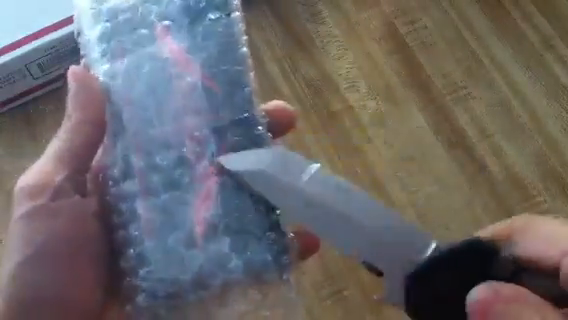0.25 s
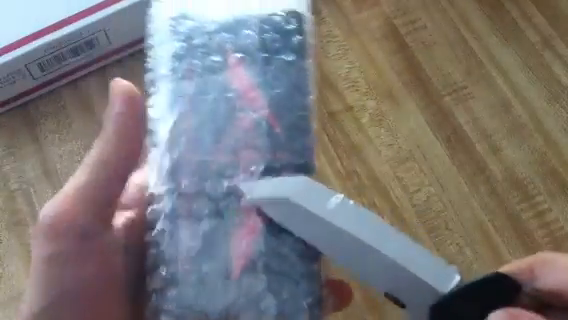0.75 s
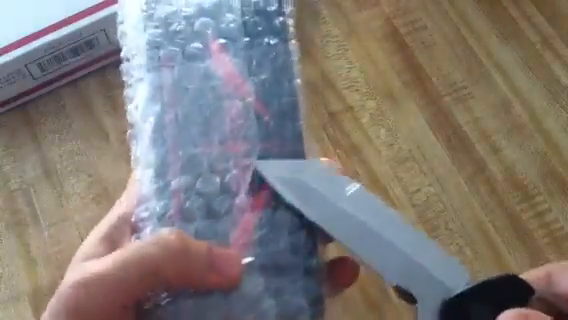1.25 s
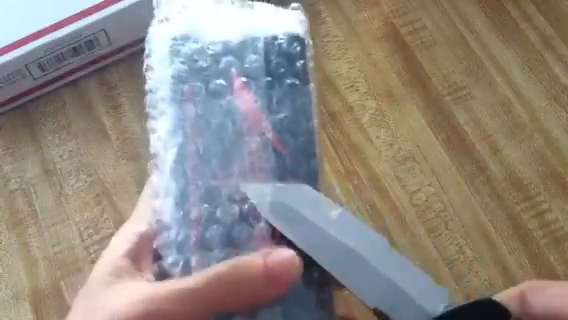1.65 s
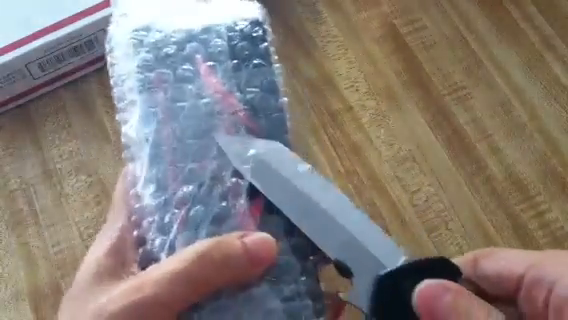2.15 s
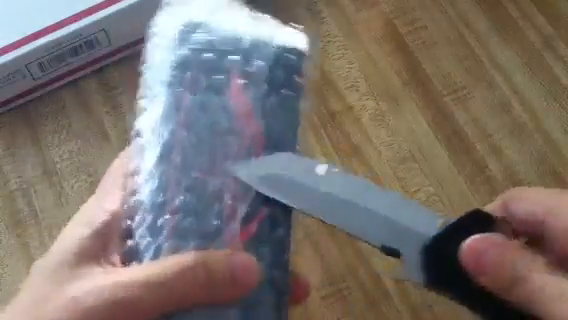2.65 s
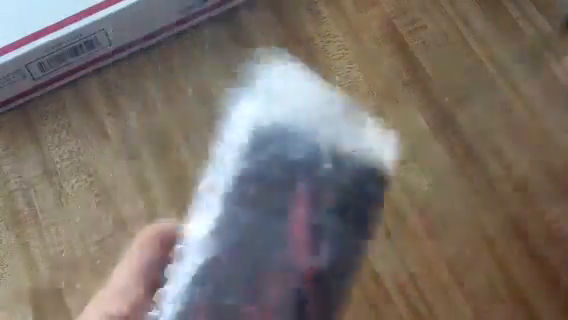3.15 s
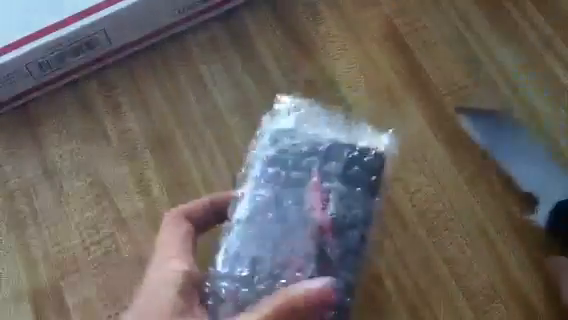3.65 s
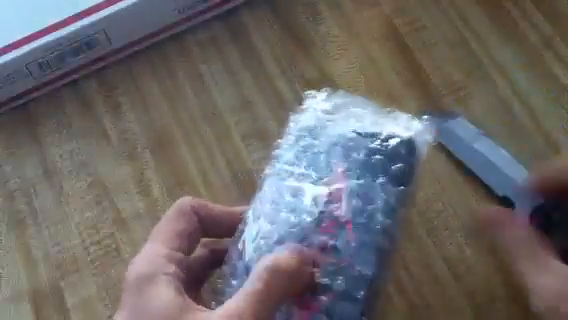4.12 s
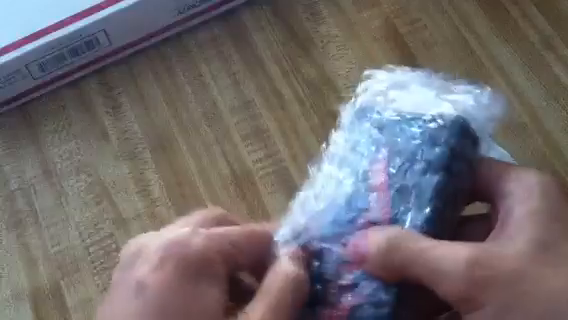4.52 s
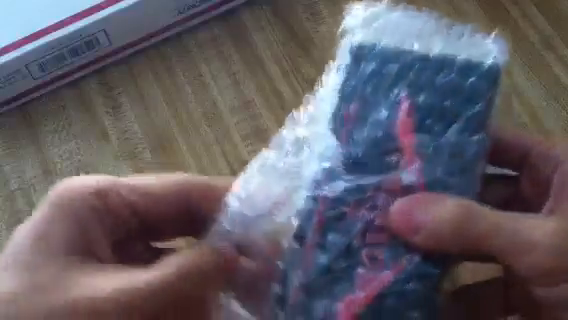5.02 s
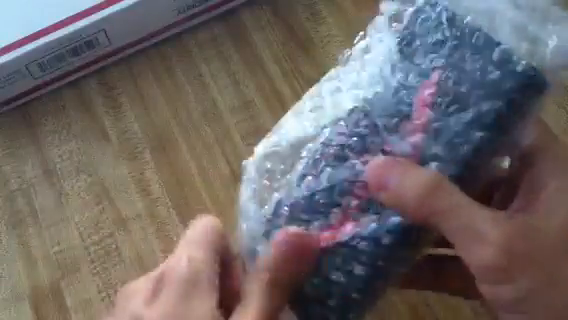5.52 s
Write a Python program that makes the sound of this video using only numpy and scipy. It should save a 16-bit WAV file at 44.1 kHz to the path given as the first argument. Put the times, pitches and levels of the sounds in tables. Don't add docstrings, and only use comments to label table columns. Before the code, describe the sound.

Bubble wrap crackles lightly as a blade picks at it, then tears sharply; the knife clatters onto a wooden table and fingers peel the wrap loudly.

```python
import sys
import numpy as np
from scipy import signal
from scipy.fft import rfft, irfft
from scipy.io import wavfile
from scipy.ndimage import uniform_filter1d

SR = 44100
rng = np.random.default_rng(int(sys.argv[2]) if len(sys.argv) > 2 else 0)


def voltage_ratio(level):
    return 10 ** (np.asarray(level, float) / 20)


def master_out(mix):
    frames = np.transpose(np.atleast_2d(mix))
    ceiling = np.clip(frames, -1, 1)
    pcm = np.round(ceiling * 32767).astype(np.int16)
    wavfile.write(sys.argv[1], SR, pcm)


N = 254898


def evened(x):
    return x / np.sqrt(np.mean(x ** 2) + 1e-20)


def read(points, hz):
    f, value = np.transpose(points)
    return np.interp(np.log(hz + 1), np.log(f + 1), value)


def add(mix, s, sound):
    part = mix[round(s * SR):][:len(sound)]
    part += sound[:len(part)]


def band(x, lo_hz, hi_hz):
    sos = signal.butter(2, [lo_hz, min(hi_hz, SR / 2 - 100)], "band", fs=SR, output="sos")
    return signal.sosfilt(sos, x)


def causal(gain_db):
    both_halves = np.r_[gain_db, gain_db[-2:0:-1]]
    log = np.log(voltage_ratio(np.maximum(both_halves, -100)))
    return np.fft.ifft(np.exp(log - 1j * signal.hilbert(log).imag)).real[:1024]


def air():
    # (frequency [Hz], level [dB per Hz])
    air_spectrum = [(18, -35), (45, -3.5), (204, -1), (319, -8), (702, -19), (844, -11), (988, -18.5),
                    (3310, -25), (5310, -20.5), (8520, -28), (10800, -33), (14800, -23), (16000, -38)]
    # (frequency [Hz], width [Hz], level [dB rms])
    hum_bands = [(115, 7.1, -71), (156.4, 17, -64.5), (330, 48, -74)]
    hz = np.fft.rfftfreq(N, 1 / SR)
    wash = evened(irfft(rfft(rng.standard_normal(N)) * voltage_ratio(read(air_spectrum, hz)), N))
    white = rfft(rng.standard_normal(N))
    hum = 0
    for f, width, db in hum_bands:
        resonance = 1 / (1 + (2 * (hz - f) / width) ** 2)
        hum = hum + voltage_ratio(db) * evened(irfft(white * resonance, N))
    return voltage_ratio(-60.5) * wash + hum


def ducking(x):
    threshold_db, share, recovery_db_per_s = -35, 0.25, 13.5
    power_db = 10 * np.log10(abs(uniform_filter1d(x ** 2, 900)) + 1e-12)
    fall = np.arange(N) * recovery_db_per_s / SR
    held_db = np.maximum.accumulate(power_db + fall) - fall
    over_db = np.maximum(held_db - threshold_db, 0)
    return voltage_ratio(-share * uniform_filter1d(over_db, 900))


def handling():
    # (time of the top [s], top level [dB], 10 dB rise [ms], 10 dB fall [ms], brightness [dB])
    knife_moves = [(.06, -50.5, 200, 108, -8), (.15, -55.5, 13, 37, -2), (.285, -49, 12, 19, -5.5),
                   (.486, -50, 101, 39, -7), (.665, -53.5, 34, 20, -9), (.76, -50.5, 135, 700, -8),
                   (1.004, -48, 78, 53, -6.5), (1.291, -44, 78, 63, -6.5), (1.405, -60.5, 20, 29, -7),
                   (1.598, -45, 68, 280, -6), (1.966, -50.5, 203, 158, -6.5), (2.095, -38.5, 21, 28, -9),
                   (2.411, -52.5, 200, 50, -5.5), (2.639, -52.5, 280, 78, -5.5), (2.746, -52, 70, 122, -7),
                   (3.003, -32, 2.5, 45, -7.5), (3.047, -32, 19, 14, 1), (3.084, -24, 31.5, 11.5, -5),
                   (3.178, -38.5, 88, 31, -11.5), (3.25, -51.5, 92, 189.5, -8.5),
                   (3.401, -50, 14, 704, -10.5), (3.623, -46.5, 47, 46, -11), (3.764, -46.5, 38, 44, -6)]
    finger_moves = [(3.918, -49.5, 730, 60, -9.5), (3.961, -38, 19, 55, -13), (4.04, -42, 30, 99, -22),
                    (4.137, -37.5, 63, 30, -7.5), (4.459, -40, 270, 296, -10), (4.66, -41, 50, 60, -5),
                    (4.741, -30, 25, 25.7, -5.5), (4.798, -31, 30, 120, -9), (4.973, -37, 60, 90, -10),
                    (5.205, -43, 280, 185, -8.5), (5.45, -48, 63, 109, -7.5), (5.571, -35, 27, 38, -9),
                    (5.63, -31.5, 17, 41.7, -8), (5.7, -41.5, 67, 200, -7.5), (5.775, -39, 24, 50, -15)]
    t = np.arange(0, N + 32, 32) / SR
    s, db, rise_ms, fall_ms, bright_db = np.transpose(knife_moves + finger_moves)[:, :, None]
    dull_db = np.repeat([-11.5, -11], [len(knife_moves), len(finger_moves)])[:, None]
    away = 1000 * (t - s) / np.where(t < s, -rise_ms, fall_ms)
    power = voltage_ratio(db - 10 * away) ** 2
    total = power.sum(0)
    level = 10 * np.log10(total)
    dull = (power * dull_db).sum(0) / total
    bright = (power * bright_db).sum(0) / total
    return [np.interp(np.arange(N) / SR, t, control) for control in (level, dull, bright)]


def crease_grains(thick):
    creases_per_s, spread_db, decay_s, half_octaves = 950, 3.0, 0.00035, 1.0
    size = voltage_ratio(spread_db * np.minimum(rng.exponential(1, N), 3.2))
    size *= (rng.random(N) < creases_per_s * thick / SR) / np.sqrt(thick)
    kind, t, grains = rng.integers(0, 24, N), np.arange(128) / SR, np.zeros(N)
    for k, hz in enumerate(np.geomspace(900, 12000, num=24)):
        burst = rng.standard_normal(128) * np.exp(-t / decay_s)
        grain = evened(band(burst, hz / 2 ** half_octaves, hz * 2 ** half_octaves))
        grain = grain * np.sqrt(hz)
        grains += signal.oaconvolve(size * (kind == k), grain)[:N]
    return grains


def crackle():
    # (frequency [Hz], level [dB per Hz])
    film_spectrum = [(210, -20), (350, 1.5), (506, -17.5), (548, -8.5), (928, -4.5), (2270, -3),
                     (3230, 0.5), (5390, -0.5), (6430, -3.5), (13200, -8.5), (16000, -34)]
    level_db, dull_db, bright_db = handling()
    thick = 1 + voltage_ratio(1.2 * (level_db + 41))
    rub = evened(crease_grains(thick)) + 1.12 * rng.standard_normal(N)
    rub = signal.oaconvolve(rub, causal(read(film_spectrum, np.fft.rfftfreq(4096, 1 / SR))))[:N]
    rub /= np.std(band(rub, 1000, 9000))
    clump_db, clump_s = 1.5, 0.012
    clumps = uniform_filter1d(rng.standard_normal(N), int(clump_s * SR))
    rub *= voltage_ratio(clump_db * evened(uniform_filter1d(clumps, 100)))
    low = (voltage_ratio(dull_db + 12.0) - 1) * band(rub, 300, 2500)
    high = (voltage_ratio(bright_db + 9.0) - 1) * band(rub, 4340, 15000)
    return voltage_ratio(level_db - 3.0) * (rub + low + high)


def snap(hz, low_db, high_db, ms, sharp, chance):
    age = np.arange(len(chance)) / SR * 1000 / ms
    slips = chance * abs(chance) ** 1.68
    slips = slips * np.minimum(age * 11.0 + 0.71, 1) * np.exp(-1.4 * age)
    slips[6] += sharp * abs(slips).max()
    ring = evened(band(slips, hz / 1.113, hz * 1.12))
    rustle = evened(band(band(slips, 1620, 6080), 460, 11400))
    body = evened(0.45 * ring + rustle)
    push = voltage_ratio(low_db) * evened(band(slips, 308, 920))
    edge = voltage_ratio(high_db) * evened(band(band(slips, 3760, 12770), 1350, 13200))
    return (body + push + edge) / abs(body + edge).max()


def snaps():
    # (time [s], peak [dB], ring [Hz], bright edge [dB])
    gripping = [(0.139, -35.5, 6750, -15), (0.501, -33, 2740, -2), (0.656, -33.5, 4630, -1),
                (0.7537, -34.5, 3340, -17), (0.9942, -14.5, 2470, -8), (1.0038, -20, 4750, -27),
                (1.2433, -31, 6300, -3.5), (1.2765, -28.5, 3280, -14), (1.3005, -28, 4220, 7),
                (1.41, -36, 5900, -2), (1.674, -39, 3320, -17)]
    picking = [(1.8111, -26.5, 6700, 0.5), (1.9278, -20.5, 7150, 22), (1.9477, -25.5, 2920, -23),
               (1.9918, -23, 5100, -32), (2.0879, -18.5, 2840, 11), (2.2543, -27.5, 7900, 4),
               (2.32, -38, 8950, -3), (2.3376, -32.5, 3300, 2), (2.3964, -23, 4460, -8),
               (2.411, -34.5, 1600, -6), (2.4176, -29, 8400, 5), (2.465, -36, 1900, -12),
               (2.491, -29.5, 3200, 2), (2.5156, -26, 1600, 1.5), (2.6257, -22, 4700, 10),
               (2.653, -32, 7060, 11), (2.7344, -22, 3220, -2.5), (2.7735, -33, 8740, 24),
               (2.8217, -33, 8250, 7), (2.953, -46, 7300, 15)]
    cutting = [(2.9998, -21, 1660, -3), (3.0112, -17, 4700, 12), (3.0161, -16, 4270, 3),
               (3.0281, -18.5, 3270, -19), (3.0645, -19, 4030, 4), (3.0745, -18, 3340, -11),
               (3.0803, -16, 4100, -13), (3.082, -10, 4200, -27), (3.0871, -14, 7400, -17),
               (3.3823, -33.5, 3120, -15), (3.3947, -24.5, 3500, 3)]
    rattling = [(3.715, -29, 4200, -20), (3.9327, -37, 1600, -20), (3.9471, -24.5, 4420, 2),
                (3.952, -26.5, 3920, -15), (4.023, -33, 1890, -18), (4.0468, -27, 1830, -3),
                (4.054, -42, 1810, -21), (4.0836, -19.5, 1400, -18), (3.964, -33, 2500, -20),
                (4.131, -25, 3280, -18), (4.1427, -26, 2100, 7), (4.2232, -34, 2630, -0.5)]
    turning = [(4.254, -22.5, 6440, -2), (4.2767, -22.5, 5040, -1), (4.3993, -26, 4600, -0.73),
               (4.5077, -25.5, 2080, 0.48)]
    peeling = [(4.6205, -9, 3400, -4), (4.6598, -14.5, 4170, 5), (4.6678, -27, 1800, 0),
               (4.7032, -8, 4100, 1), (4.7227, -22, 3270, 4), (4.7369, -7.5, 4830, -4),
               (4.7521, -21, 4400, -4), (4.7765, -19, 3450, 5), (4.7852, -7.5, 3160, -5),
               (4.7875, -6, 4630, -5), (4.7963, -7.5, 3580, -4), (4.8102, -14, 4230, -11),
               (4.8145, -9, 4360, -19), (4.8463, -8.5, 6160, -15), (4.8601, -13.5, 5560, -17),
               (4.905, -9.5, 4470, -7.5), (4.958, -23.5, 3570, -13), (4.9808, -8, 4700, -2.5),
               (5.0574, -23, 7440, 2.5)]
    unfolding = [(5.129, -29, 3540, -6), (5.174, -25, 3600, -4), (5.1951, -19, 3340, 5),
                 (5.2752, -28, 2950, -2), (5.2785, -26, 2840, 5), (5.3324, -30, 3080, 0),
                 (5.4954, -31.5, 3340, -7), (5.5778, -16.5, 4200, 1), (5.5829, -23.5, 3670, -3),
                 (5.6195, -13, 4500, 1), (5.627, -14, 4440, 2.5), (5.6434, -24, 4390, -15),
                 (5.651, -20.5, 4420, 3.5), (5.6556, -19.5, 4050, 1), (5.693, -18.5, 4200, -2),
                 (5.7022, -14.5, 3870, 1), (5.7566, -17, 4200, 9), (5.768, -28, 3270, 5),
                 (5.7727, -10, 4200, 11)]
    flipping = [(1.558, -30.5, 1520, -5), (4.97, -23, 3250, -5.5), (5.0167, -28, 1650, -16),
                (5.184, -34, 1700, -15), (5.222, -40, 2050, -13), (5.31, -34, 2160, -4),
                (5.321, -38, 1730, -7), (5.435, -33, 2060, -6)]
    popping = [(2.0783, -19.5, 2960, -8), (3.0739, -4, 4070, 0), (4.4534, -16.5, 3270, -4),
               (4.738, -5.5, 3660, -2.5), (4.8472, -12.5, 6070, -8), (4.8146, -3, 7100, -0.5)]
    # (time [s], peak [dB], ring [Hz])
    knife_ticks = [(0.0096, -36, 8530), (0.1084, -39, 3700), (0.1637, -36, 7280), (0.2259, -45, 8700),
                   (0.3036, -38, 6400), (0.3573, -37, 8700), (0.5027, -31, 6550), (0.6861, -48, 3400),
                   (0.7438, -32, 7110), (0.7465, -29, 3500), (0.8578, -34.5, 6120), (1.0104, -42, 2450),
                   (1.092, -41, 4010), (1.1304, -50, 3490), (1.1454, -49.5, 8400), (1.1649, -49, 4390),
                   (1.2139, -43, 2580), (1.2482, -30, 3400), (1.3029, -31, 6200), (1.305, -32.5, 3320),
                   (1.3295, -35, 4220), (1.4022, -37, 1860), (1.58, -34, 4180), (1.6529, -30, 4480),
                   (1.6759, -30, 3360), (1.717, -36, 3140), (1.7368, -32, 2900), (1.8289, -39, 6330),
                   (1.8867, -37, 4440), (1.9543, -21.5, 6540), (1.9608, -43, 4870), (2.0934, -28, 1190),
                   (2.0975, -29, 3400), (2.1822, -34, 8900), (2.1905, -45, 6760), (2.2208, -43, 6720),
                   (2.2463, -36.5, 6290), (2.2969, -39, 3010), (2.3112, -35, 7540), (2.5083, -36, 4740),
                   (2.5929, -37.5, 4520), (2.6365, -35, 8790), (2.6791, -32, 8600), (2.6918, -37.5, 3960),
                   (2.7582, -31, 8400), (2.8058, -39, 3140), (2.8084, -35, 4610), (2.8356, -37, 9050),
                   (2.8375, -42, 3960), (2.939, -39, 8140)]
    finger_ticks = [(2.9601, -38, 6890), (2.9694, -33, 7970), (2.9871, -31, 3040), (3.0003, -17.5, 3560),
                    (3.0028, -28, 3530), (3.0065, -24, 4350), (3.0108, -13, 4520), (3.0446, -19, 3880),
                    (3.0634, -13.5, 3920), (3.0679, -10, 6550), (3.0773, -24, 8570), (3.0961, -22, 4610),
                    (3.2609, -33, 3230), (3.3173, -36, 3360), (3.4581, -35.5, 3206), (3.6324, -30.5, 4870),
                    (3.8869, -42, 4480), (3.8887, -36, 3490), (3.9339, -29, 1810), (3.9464, -21, 4330),
                    (3.953, -26, 3700), (3.9629, -25, 4130), (3.9656, -27, 4480), (4.0244, -24, 2020),
                    (4.0488, -13.5, 1480), (4.0569, -31, 1720), (4.0846, -20.5, 4640), (4.2374, -30, 4740),
                    (4.3439, -40, 3140), (4.3675, -37, 4260), (4.3999, -24, 4480), (4.4306, -25, 4970),
                    (4.5694, -34, 3000), (4.5713, -33, 3190), (4.5895, -39, 6630), (4.6676, -22, 3980),
                    (4.79, -13, 2830), (4.7917, -18, 3320), (4.7988, -15, 3530), (4.8125, -20, 4050),
                    (5.1993, -35, 6850), (5.2215, -28, 4570), (5.2739, -30.5, 2950), (5.501, -32.5, 4650),
                    (5.5614, -33, 9090), (5.5746, -22.5, 3430), (5.6087, -31, 4570), (5.629, -17, 3500),
                    (5.6307, -21, 4180), (5.6341, -23, 4320), (5.6477, -21, 4050), (5.6625, -31, 4570),
                    (5.6644, -18, 3900), (5.7094, -24, 4480), (5.7369, -31, 2200)]
    # (creases, low push [dB], length [ms], strength of the first break)
    actions = [(gripping, -12.5, 2.1, 2.44), (picking, -18, 1.8, 1.8), (cutting, -14.5, 1.6, 1.55),
               (rattling, -27, 2.8, 0.61), (turning, -15, 2.3, 1), (peeling, -19.5, 1.8, 1.27),
               (unfolding, -15.5, 2.34, 0.87), (flipping, -9.5, 2.6, 1.6), (popping, -18, 0.65, 4.6),
               (knife_ticks, -22, 1, 2.7), (finger_ticks, -16, 0.63, 1.5)]
    out = np.zeros(N)
    for creases, low_db, ms, sharp in actions:
        for s, db, hz, *edge in creases:
            edge_db = edge[0] if edge else -5.5 + 10.5 * np.log2(hz / 4000)
            chance = rng.standard_normal(600)
            add(out, s, voltage_ratio(db + 1.0) * snap(hz, low_db, edge_db, ms, sharp, chance))
    return out


def jolts():
    jolt_events = [(0.994, -37, 1940, 0.032), (2.088, -37, 373, 0.083), (2.086, -30, 1154, 0.014),
                   (2.734, -47.5, 1443, 0.085), (3.062, -25.5, 203, 0.058), (3.082, -30.5, 326, 0.032),
                   (3.166, -39, 1994, 0.092), (3.165, -34.5, 1456, 0.028), (4.248, -46, 446, 0.19),
                   (4.336, -41, 440, 0.046), (5.1, -32.5, 320, 0.026), (4.737, -18, 277, 0.013),
                   (4.788, -34, 200, 0.079), (5.045, -29.5, 1050, 0.019), (5.05, -32.5, 770, 0.014),
                   (4.788, -36, 900, 0.081), (4.705, -33, 770, 0.028), (4.845, -24.5, 845, 0.022),
                   (3.001, -36, 355, 0.027), (3.029, -37, 330, 0.032), (3.0965, -31, 290, .035),
                   (4.3135, -43, 280, .07), (4.398, -44, 270, .05), (4.418, -44, 430, .04),
                   (2.254, -41, 856, 0.019), (3.068, -34, 1480, .12), (2.515, -42, 640, 0.017),
                   (4.0232, -11, 260, .045), (4.466, -48, 910, .025), (4.572, -39.5, 425, 0.023),
                   (4.738, -24, 860, .02), (4.98, -28.5, 1030, 0.018), (5.016, -31, 830, 0.022),
                   (5.173, -36.5, 930, 0.022), (5.194, -36, 1100, 0.022), (5.773, -32, 970, 0.029),
                   (2.815, -45.5, 1000, .02), (4.622, -31.5, 760, 0.014)]
    out, t = np.zeros(N), np.arange(SR // 5) / SR
    for s, db, hz, t60 in jolt_events:
        pair = np.sin(2 * np.pi * hz * t) + 0.43 * np.sin(2 * np.pi * hz * 1.3 * t)
        onset = np.minimum(t * hz, 1)
        add(out, s, voltage_ratio(db - 60 * t / t60) * pair * onset / 0.91)
    return out


def knocks():
    # (time [s], peak [dB], contact hardness [Hz], share of dense wood ring [dB], t60 [s])
    knife_hits = [
        (3.7136, -28, 1100, -9, 0.32),
        (3.733, -37, 1600, -3, 0.2),
        (3.932, -15.5, 300, -9, 0.097),
        (3.946, -19, 400, -8, 0.14),
        (4.0225, -9, 1010, -3.5, 0.19),
        (4.0477, -10, 2680, 4, 0.13),
        (4.085, -18.5, 1940, 2, 0.42),
    ]
    # (frequency [Hz], level [dB], t60 [s])
    tip = [(851, -0.5, 0.064), (773, -3, 0.094), (600, -20, .08), (268, -6, 0.063), (204, -6.5, 0.11),
           (306, -13, 0.071), (1610, -12, 0.15), (1680, -11, 0.088), (1765, -7, .08), (2430, -3, 0.053),
           (2070, -16, 0.045)]
    near = [(205, -12, 0.15), (290, 12, 0.02), (370, -4.5, 0.05), (486, -4, .2), (600, -33, 0.17),
            (755, -28, 0.23)]
    far = [(212.6, -0.5, 0.16), (293, 1, 0.12), (352, -4, 0.17), (468, -1, 0.084), (526, -3, 0.085),
           (564, -11, 0.11), (692, 0, 0.059), (798, -10, 0.14), (1000, -10, 0.071), (1400, -8, 0.094),
           (1534, -12, 0.067), (1700, -6.5, 0.1), (1974, -2.5, 0.044)]
    blade = [(511, -5, 0.092), (730, -0.5, 0.093), (1523, -2, .07), (1720, -3, 0.064), (2000, -5, 0.069),
             (2470, -1.5, 0.037), (2740, -6, 0.034), (3760, -12, 0.019)]
    longest_t60 = 0.15
    out, t = np.zeros(N), np.arange(SR // 2) / SR
    for (s, db, hard_hz, dense_db, t60), spot in zip(knife_hits, [tip, tip, near, near, far, blade, far]):
        modes = np.zeros(len(t))
        for hz, mode_db, life in spot:
            sign = 1 if hz < 320 else rng.choice([-1, 1])
            modes += sign * voltage_ratio(mode_db - 60 * t / min(life, longest_t60)) * np.sin(2 * np.pi * hz * t)
        dense = band(rng.standard_normal(len(t)), 153, 2 * hard_hz) * voltage_ratio(-60 * t / t60)
        dense *= 1 + 0.97 * np.exp(-t / 0.0034)
        x = modes / abs(modes).max() + voltage_ratio(dense_db) * dense / abs(dense).max()
        push = np.exp(-2 * np.pi * hard_hz * t[:200])
        x = signal.oaconvolve(x, push)[:len(t)]
        x = band(band(x, 185, 5400), 175, 12000)
        add(out, s, voltage_ratio(db) * x / abs(x).max())
    return out


def room(x):
    # (frequency [Hz], t60 [s])
    room_decay = [(200, 0.41), (800, 0.37), (3000, 0.18), (9000, 0.17)]
    taps = np.zeros(SR // 2)
    at = np.arange(200, len(taps) - 20, 20)
    taps[at + rng.integers(0, 20, len(at))] = rng.choice([-1., 1.], len(at))
    hz, t, z = signal.stft(taps, SR, nperseg=256)
    decay = voltage_ratio(-60 * t / read(room_decay, hz)[:, None])
    tail = signal.istft(z * decay, SR, nperseg=256)[1]
    return signal.fftconvolve(x, tail / np.linalg.norm(tail))[:N]


def scene():
    film = snaps() + jolts() + crackle()
    knife = knocks()
    wet = room(voltage_ratio(-13) * film + voltage_ratio(-5.5) * knife)
    return (film + knife + wet + ducking(film + knife) * air())[None]


def top_cut(x):
    return signal.sosfilt(signal.butter(12, 16620, fs=SR, output="sos"), x)


def record(dry):
    # (frequency [Hz], width [Hz], level [dB])
    port = [(5420, 540, -7), (4200, 2000, 0.5)]
    # (frequency [Hz], level [dB])
    slopes = [(30, -16), (80, -13.5), (130, -3), (9000, 0.5), (12000, -5.5), (14500, -8.5), (16500, -15)]
    hz = np.fft.rfftfreq(4096, 1 / SR)
    response_db = read(slopes, hz)
    for f, width, db in port:
        response_db = response_db + db / (1 + (2 * (hz - f) / width) ** 2)
    heard = signal.oaconvolve(dry, causal(response_db)[None])[:, :N]
    heard = heard + 0.14 * band(heard ** 2, 14, 96)
    treble_edge = signal.firwin(255, 16550, window=("kaiser", 9), fs=SR)
    heard = signal.oaconvolve(heard, treble_edge[None], "same")
    return top_cut(heard)


dry = scene()
out = record(dry)
master_out(out)
```